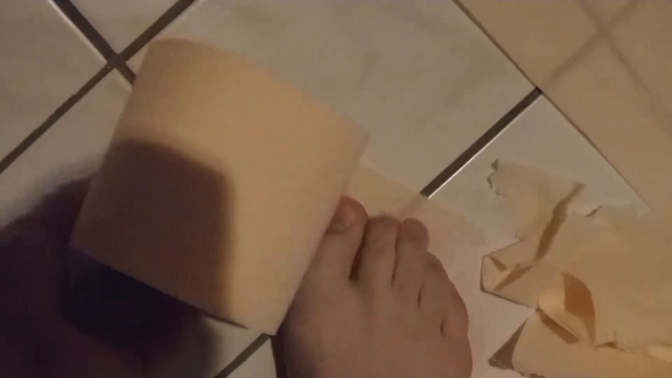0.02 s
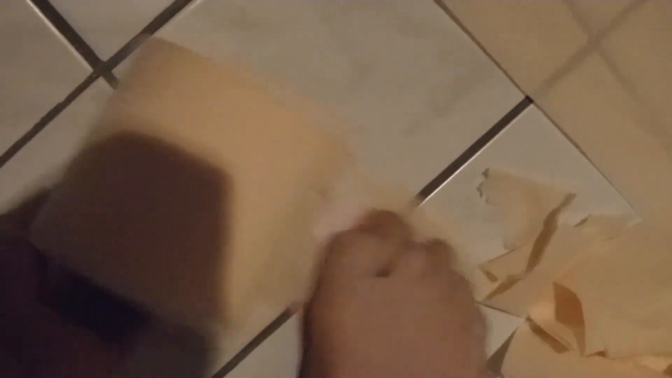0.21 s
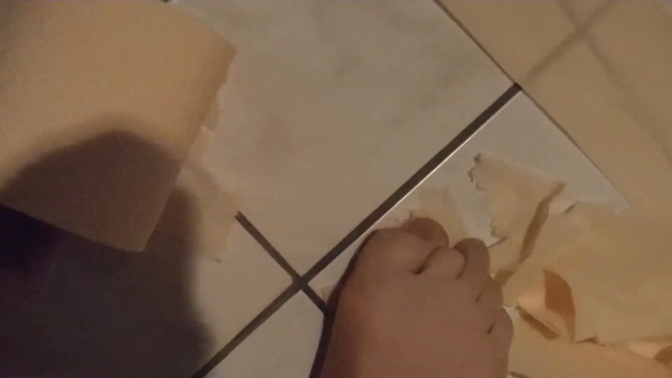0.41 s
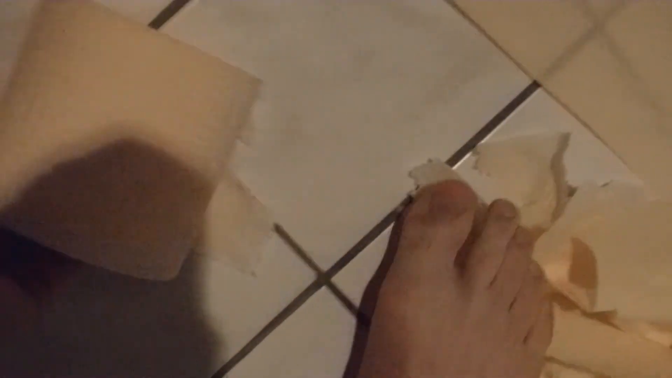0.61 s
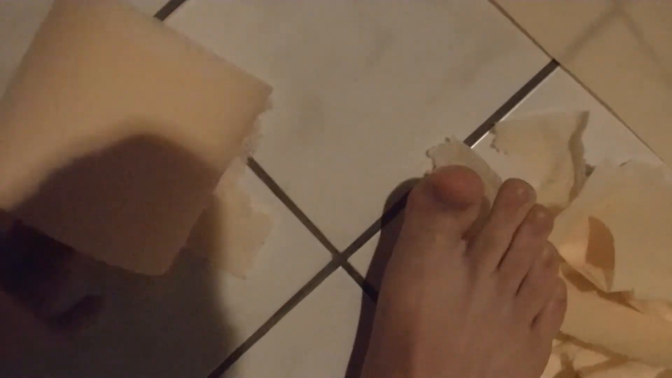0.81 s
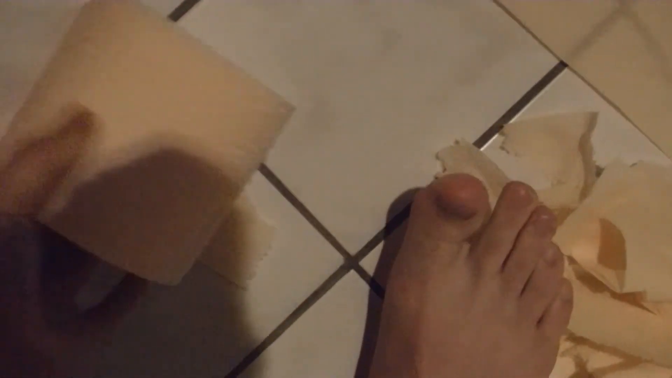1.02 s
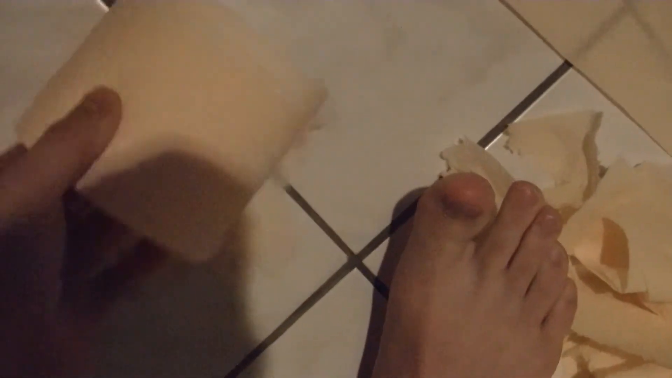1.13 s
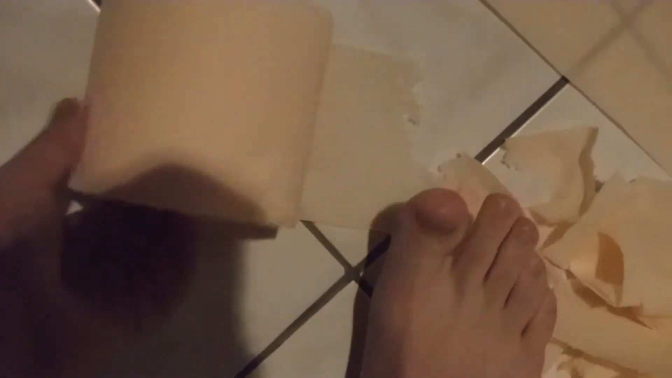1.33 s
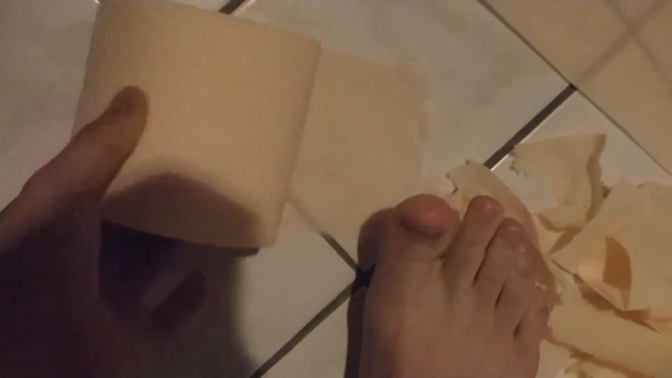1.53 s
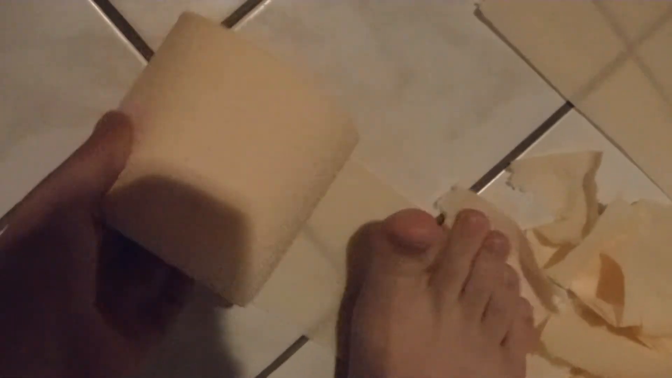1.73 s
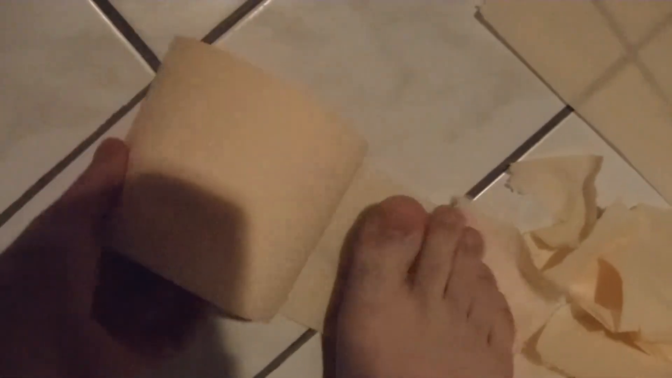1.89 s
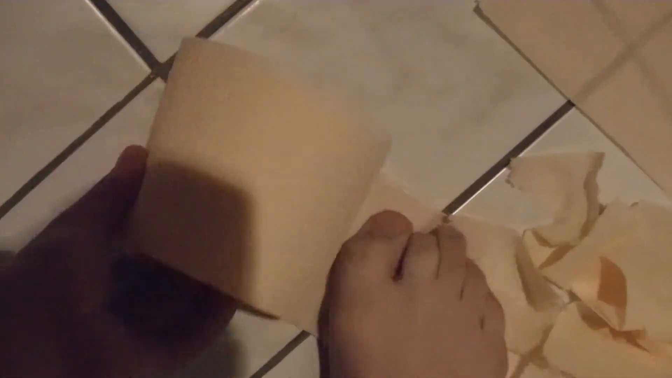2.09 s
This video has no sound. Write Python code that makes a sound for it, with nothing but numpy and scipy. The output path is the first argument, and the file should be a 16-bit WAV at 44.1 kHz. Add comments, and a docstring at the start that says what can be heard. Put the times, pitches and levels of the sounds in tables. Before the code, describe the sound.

A sheet of paper rips sharply off a roll, then soft rustling in a small tiled room

```python
"""Tearing paper off a roll

A hand pulls a paper roll near a tiled bathroom floor, rips a sheet off, then turns and handles the roll.
Clicks and hiss make the crackling fibres, rustle and slides; short pushes ring the hollow roll as snaps
and taps. Noise in narrow resonances makes the bursts of a small camera motor over a quiet room tone.
Fading noise gives the tiles' short bright echo, and low resonances ring as the room's standing waves."""
import sys
import numpy as np
from scipy import signal
from scipy.fft import rfft, irfft
from scipy.io import wavfile
from scipy.ndimage import uniform_filter1d, map_coordinates

SR = 44100
rng = np.random.default_rng(int(sys.argv[2]) if len(sys.argv) > 2 else 0)


def unload_wav(signal):
    """Save mono or channel-first audio to the path in sys.argv[1] as 16-bit WAV at rate SR, clipped to [-1, 1]."""
    wavfile.write(
        sys.argv[1],
        SR,
        np.round(np.clip(np.atleast_2d(signal).T, -1, 1) * 32767).astype(np.int16),
    )


def invert_db(x):
    """Field ratio 10**(x/20) for x, a level in decibels (scalar or array-like)."""
    u = np.asarray(x, float) / 20
    return 10 ** u


N = 92610  # length of the scene [samples]

# ways the hollow roll rings, before grip and pitch change them: pitch_hz [Hz], level_db [dB],
# ring_s [s to fall 60 dB]
ROLL_MODES = [(755, 9, 0.036), (362, -24, 0.085), (526, 0, 0.076), (700, -11, 0.028), (980, 1.5, 0.024),
              (1179, 2, 0.037), (1030, -17, 0.0035)]


def unit(x):
    """Scale to an average (rms) level of 1."""
    return x / np.sqrt(np.mean(x ** 2))


def curve(table, column):
    """Gain from a dB column over time, silent outside the table."""
    rows = np.vstack(table)
    level_db = np.interp(np.arange(N) / SR, rows[:, 0], rows[:, column], left=-200, right=-200)
    return invert_db(level_db)


def across(points, n):
    """Read a (Hz, value) table at every frequency of an n-sample transform."""
    rows = np.array(points, float)
    hz = np.arange(n // 2 + 1) * SR / n
    return np.interp(np.log(hz + 1), np.log(rows[:, 0]), rows[:, 1])  # +1 avoids log(0)


def colour(x, points):
    """Shape a spectrum by (Hz, dB) points, then scale to rms 1."""
    return unit(irfft(rfft(x) * invert_db(across(points, N)), N))


def ring(x, hz, width):
    """Two-pole resonance, gain 1 at its centre; a narrow one rings for longer."""
    return signal.lfilter(*signal.iirpeak(hz, hz / width, SR), x)


def grains(rate, spread_db, hiss_db):
    """Random clicks of uneven size, rate per second on average, over hiss; rms 1."""
    chance, sign, size = rng.random((3, N))
    clicks = (chance < rate / SR) * np.sign(sign - .5) * invert_db(-spread_db * np.log(size + 0.093))
    return unit(unit(clicks) + invert_db(hiss_db) * rng.standard_normal(N))


def gate(start, length, rise, fall):
    """Swell over the rise, hold to the end of length, then die away (all in s)."""
    t = np.arange(N) / SR - start
    return np.clip(t / rise, 0, 1) * np.exp(-np.maximum(t - length, 0) / fall)


def flutter(rate, depth_db):
    """Quick random wobble: about rate new levels per second, smoothed after depth_db sets their spread."""
    hold = int(SR / rate)
    steps = np.repeat(rng.standard_normal(N // hold + 1), hold)[:N]
    return invert_db(depth_db * uniform_filter1d(steps, hold))


def room_tone():
    """Quiet steady noise of the room, shaped from bass to treble."""
    # spectrum of the room tone: pitch_hz [Hz], level_db [dB per Hz, relative]
    tone_colour = [(15, -51), (25, -24), (425, -1), (1360, 0), (1820, -7.5), (2090, -4), (3490, -10.5),
                   (3990, -7.5), (6850, -13), (9720, -11.5), (15800, -21)]
    return invert_db(-60) * colour(rng.standard_normal(N), tone_colour)


def standing(x):
    """Low resonances between the walls: sound of the right pitch keeps bouncing and rings on."""
    # standing waves of the small room: pitch_hz [Hz], level_db [dB]
    room_modes = [(165, -1), (232, 10.5), (308, 0.5)]
    ring_s = 0.72  # time to fall 60 dB
    width_hz = np.log(1000) / np.pi / ring_s
    return sum(invert_db(db) * ring(x, hz, width_hz) for hz, db in room_modes)


def motor():
    """Short rattling noise bursts through the narrow resonances of the camera body, in two channels."""
    # camera motor bursts: start_s [s], length_s [s], level_db [dB]
    bursts = [(0.014, 0.057, -56), (0.084, 0.021, -55), (0.114, 0.021, -55.5), (.165, 0.035, -51.5),
              (.40, 0.015, -52.5), (0.482, 0.022, -51.5), (.69, 0.034, -57), (.955, 0.016, -55.5),
              (1.065, 0.019, -51.5), (1.12, 0.018, -51.5), (1.374, 0.051, -55), (1.508, 0.049, -53.5),
              (1.69, 0.035, -54), (1.843, 0.022, -53.5), (1.88, 0.067, -61.5), (1.954, 0.029, -57),
              (2.05, 0.045, -55.5), (1.481, 0.012, -56), (.435, 0.017, -56)]
    # resonances of the camera body: pitch_hz [Hz], width_hz [Hz], level_db [dB, relative]
    buzz = [(2110, 84, 2.5), (3930, 420, 5.5), (6500, 300, -1), (9580, 190, 7.5), (11470, 330, 2.5)]
    on = sum(invert_db(db) * gate(start, length, 0.0025, 0.0027) for start, length, db in bursts)
    channels = []
    for noise in rng.standard_normal((2, N)) * flutter(140., 3.5):
        rattle = sum(invert_db(db) * unit(ring(noise, hz, width)) for hz, width, db in buzz)
        channels.append(on * unit(rattle))
    return np.array(channels)


def roll(x, pitch, damp):
    """The hollow roll rings with its modes; pitch shifts them and damp divides their ring time."""
    out = 0
    for hz, db, ring_s in ROLL_MODES:
        out = out + invert_db(db) * ring(x, hz * pitch, damp * np.log(1000) / np.pi / ring_s)
    return out


def knocks(table, half_push_s):
    """Short pushes, about twice half_push_s long, that each ring the roll once."""
    push = np.diff(signal.windows.hann(int(2 * half_push_s * SR) + 3))
    out = np.zeros(N)
    for start, db, hz in table:
        one = roll(np.pad(push, (0, 4096)), hz / ROLL_MODES[0][0], 0.81)
        first = int(start * SR)
        out[first:first + len(one)] += invert_db(db) * one / np.abs(one).max()
    return out


def rip(body_db):
    """Fibres break in a dense crackle and thrum the roll; snaps and taps knock it. body_db sets the roll."""
    # the rip: time_s [s], crackle_db of the fibres [dB], thrum_db of the roll [dB, before body_db]
    tear = [(.13, -69, -56.5), (.18, -52.5, -50.5), (.216, -41.5, -44), (.236, -43, -46), (.25, -26, -26.5),
            (.27, -33.5, -32), (.312, -41, -37.5), (.322, -45, -44.5), (.36, -55.5, -44), (.40, -58, -62),
            (.44, -65, -66)]
    # spectrum of the crackle: pitch_hz [Hz], level_db [dB per Hz, relative]
    crackle_colour = [(880, -32), (1500, -1), (2790, -8.5), (4610, -6.5), (5190, -6), (11400, -10.5),
                      (15800, -20.5)]
    # snaps of the sheet that knock the roll, squeezed differently each time:
    # start_s [s], level_db [dB peak, before body_db], pitch_hz of the strongest mode [Hz]
    snaps = [(.2405, -15.5, 821), (.2462, -13.5, 731), (.2490, -10.5, 730), (.2530, -19.5, 749),
             (.2597, -16, 821), (.2668, -23.5, 646), (.2748, -22, 837), (.2845, -19.5, 684),
             (.2905, -29, 980), (.2995, -22.5, 795), (.3070, -26.5, 795), (.3135, -27, 780)]
    # fingers tap the roll softly: same columns and units as the snaps
    taps = [(.4725, -46.5, 1007), (.836, -44, 485), (1.556, -46.5, 780), (1.757, -48, 740)]
    crackle = curve(tear, 1) * colour(grains(9000., 1.7, 0.44), crackle_colour) * flutter(159.8, 2.7)
    # the gripping hand halves the ring time of the thrum
    thrum = curve(tear, 2) * unit(roll(grains(1200., 1.3, -0.31), 0.99, damp=2))
    body = thrum + knocks(snaps, 0.00041) + knocks(taps, 0.00064)
    return crackle + invert_db(body_db) * body


def tiles(x):
    """Echo of the tiles: dense fading reflections, a different pattern for each call."""
    t = np.arange(int(.5 * SR)) / SR
    fade = np.exp(-np.log(1000) * t / 0.33)  # falls 60 dB in 0.33 s
    tail = rng.standard_normal(len(t)) * fade * np.clip(t / 0.006, 0, 1)
    tail = tail / np.sqrt(np.sum(tail ** 2))
    return invert_db(-10.5) * signal.fftconvolve(x, tail)[:N]


def paper_and_fingers():
    """Paper rustles as small grains with a separate bright top, while fingers rub the roll lower down."""
    # handling: time_s [s], rustle_db of paper [dB], rub_db on the roll [dB], top_db of the high treble [dB]
    moves = [(.40, -60, -57, -63), (.445, -66, -56, -64), (.47, -53, -53, -63), (.50, -53.5, -55, -62),
             (.57, -54, -57.5, -57.5), (.62, -46.5, -48, -48.5), (.67, -54.5, -60.5, -68),
             (.73, -54.5, -60.5, -63), (.77, -49.5, -62, -54), (.81, -58.5, -57.5, -58),
             (.84, -51, -53.5, -58), (.91, -62, -56, -96), (1.01, -60.5, -57, -60), (1.04, -78, -58.5, -77),
             (1.14, -49, -55, -54.5), (1.23, -58, -59.5, -57), (1.29, -48, -54.5, -49),
             (1.36, -63.5, -62.5, -60.5), (1.47, -78, -75, -74), (1.54, -67, -71, -58),
             (1.565, -58, -66, -51.5), (1.59, -57.5, -62, -60), (1.64, -51, -57, -53.5),
             (1.69, -58, -59, -68), (1.76, -51, -59.5, -49), (1.84, -60, -70, -65.5),
             (2.01, -61.5, -61, -75), (2.07, -57.5, -61.5, -57), (2.1, -56.5, -56, -69)]
    # spectra of rustle, rub and top treble: pitch_hz [Hz], level_db [dB per Hz, relative]
    rustle_colour = [(880, -75), (1500, 0), (2450, 2), (2950, 0.5), (4490, 2.5), (10000, -2),
                     (13000, -15.5), (22000, -120)]
    rub_colour = [(71, -47), (120, -39), (368, -9.5), (402, -12.5), (435, -10), (1220, -2), (2600, -11),
                  (3380, -24.5), (5720, -120)]
    top_colour = [(5000, -32), (8500, -22), (11800, -14.5), (15100, -27), (15800, -22)]
    rustle = curve(moves, 1) * colour(grains(4000., 1.73, 0.78), rustle_colour) * flutter(40.0, 2.94)
    rub = curve(moves, 2) * colour(grains(900., 2.3, 3.6), rub_colour) * flutter(29.37, 1.73)
    top = curve(moves, 3) * colour(grains(4400.0, 4.0, 0.6), top_colour) * flutter(44.7, 1.1)
    return rustle + rub + top


def edge_slides():
    """A paper edge slides: grains pass twice through a resonance, leaving a thin band of sound."""
    # slides: start_s [s], length_s [s], level_db [dB], pitch_hz of the centre [Hz],
    # width_hz of the first pass [Hz]
    slides = [(0.738, 0.043, -45.5, 11800, 3500), (0.74, 0.04, -48.5, 6520, 1200),
              (0.744, 0.044, -54.5, 9030, 300), (0.816, 0.015, -49, 6760, 700),
              (0.951, 0.069, -60.5, 6370, 1500), (0.976, 0.046, -62.5, 5040, 300),
              (1.243, 0.12, -61.5, 6500, 600), (1.727, 0.035, -57, 5300, 600), (2.049, .03, -60, 1290, 500),
              (0.456, 0.031, -52.5, 1700, 1300)]
    out = np.zeros(N)
    for start, length, db, hz, width in slides:
        once = ring(grains(5000., 2.5, 2.0), hz, width)
        band = unit(ring(once, hz, 0.86 * width))
        out = out + invert_db(db) * gate(start, length, 0.021, 0.0048) * band
    return out


def core_sing():
    """Air in the cardboard core sings as the roll scrapes; faster reading raises all its resonances."""
    # song of the core: time_s [s], level_db [dB], pitch_hz of the strongest resonance [Hz]
    song = [(.8, -85, 1150.5), (.835, -56.5, 1170.5), (.885, -50, 1368.5), (.95, -58, 1362),
            (1.02, -73, 1342), (1.045, -52.5, 1343), (1.09, -76.5, 1337)]
    # core resonances, with a low one near 312 Hz that feeds the room's standing wave,
    # before the pitch moves: pitch_hz [Hz], width_hz [Hz], level_db [dB, relative]
    core = [(1348, 49, 7), (312, 19.4, -4), (537, 71, 1.5), (1540, 40, -1)]
    scrape = grains(700., 0.91, -0.52)
    sung = unit(sum(invert_db(db) * unit(ring(scrape, hz, width)) for hz, width, db in core))
    time_s, level_db, pitch_hz = np.vstack(song).T
    speed = np.interp(np.arange(N) / SR, time_s, pitch_hz) / core[0][0]
    return curve(song, 1) * map_coordinates(sung, [np.cumsum(speed)], mode="mirror")


def handling():
    """Add up rustle and rub, sliding edges and the singing core."""
    return paper_and_fingers() + edge_slides() + core_sing()


def scene():
    """Near sounds with their echo, spread between two close microphones, over the room tone."""
    # likeness of the two microphones: pitch_hz [Hz], side_minus_mid_db [dB]
    side_width = [(60, 2), (250, 3), (700, -1), (2400, -6), (8000, -4), (15000, 1)]
    # balance of the two microphones: pitch_hz [Hz], left_minus_right_db [dB]
    side_lean = [(300, 1.5), (1500, 2.1), (5000, -0.9)]
    bass_cut = signal.butter(N=3, Wn=220., btype="high", fs=SR, output="sos")

    near = signal.sosfilt(bass_cut, rip(body_db=-1.0) + handling())
    mid = near + tiles(near) + room_tone()
    mid = mid + standing(mid)

    # the side has new random grains; the roll's body sits nearer the centre than the crackle
    other = signal.sosfilt(bass_cut, rip(body_db=-13) + handling())
    # random phases smear the near sound in time without changing its spectrum
    smear = rng.standard_normal(1024) * np.exp(-np.arange(1024) / 300.)
    smeared = irfft(rfft(other) * np.exp(1j * np.angle(rfft(smear, N))), N)
    other = smeared + tiles(other) + room_tone()

    side = rfft(other) * invert_db(across(side_width, N))
    lean = invert_db(across(side_lean, N) / 2)  # half the difference on each channel
    left = irfft((rfft(mid) + side) * lean, N)
    right = irfft((rfft(mid) - side) / lean, N)
    return np.array([left, right]) + motor()


def roll_off(x):
    """The treble ends steeply here."""
    return signal.sosfilt(signal.butter(12, 16020, fs=SR, output="sos"), x)


def record(dry):
    """Turn the finished mix into the final sound."""
    return roll_off(dry)


dry = scene()
out = record(dry)
unload_wav(out)
```